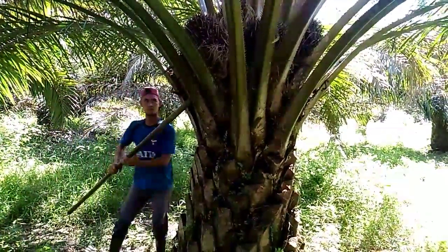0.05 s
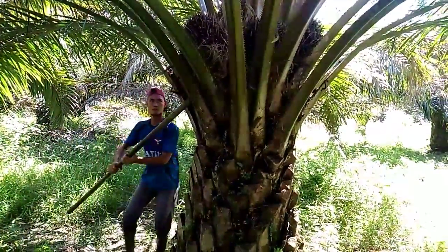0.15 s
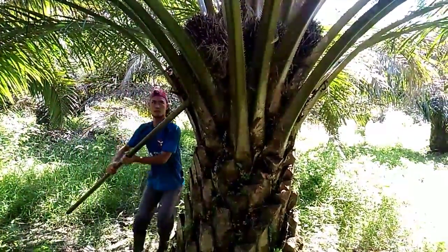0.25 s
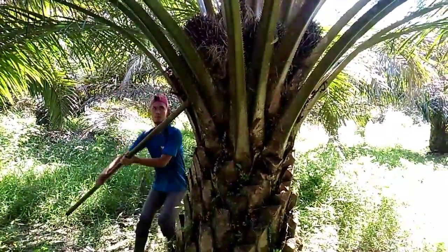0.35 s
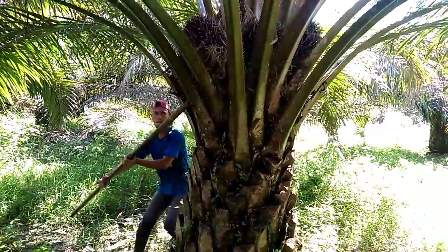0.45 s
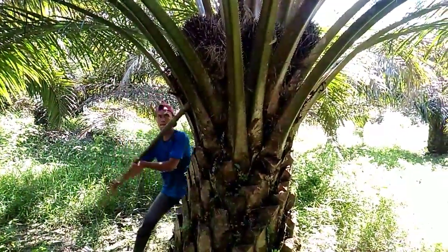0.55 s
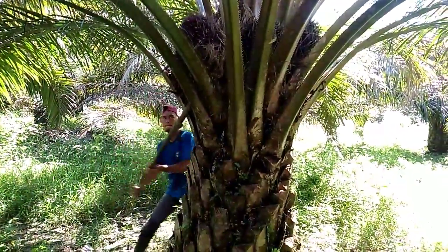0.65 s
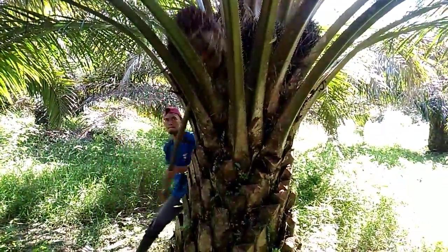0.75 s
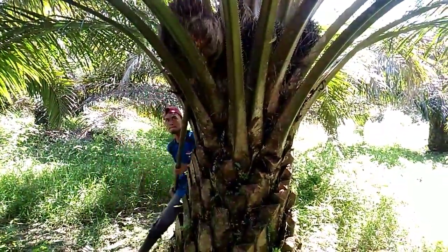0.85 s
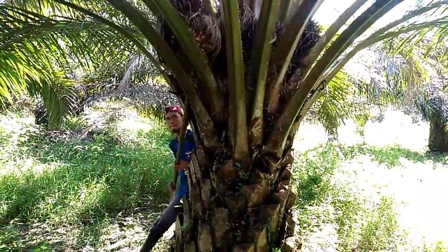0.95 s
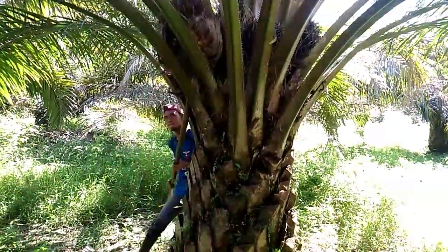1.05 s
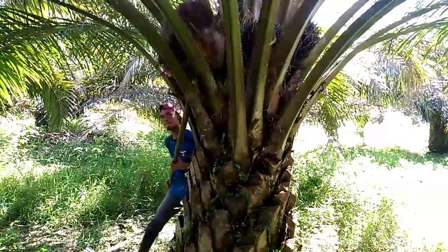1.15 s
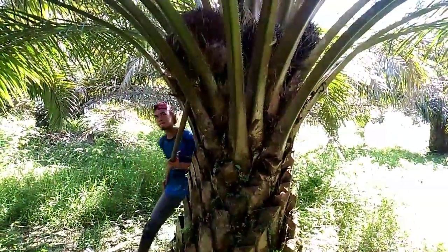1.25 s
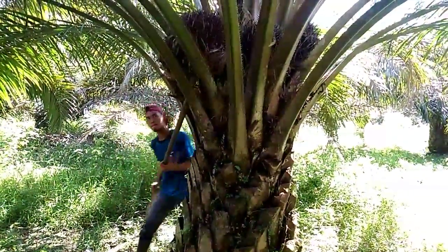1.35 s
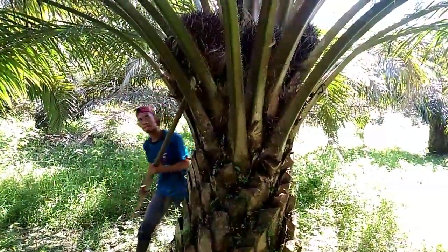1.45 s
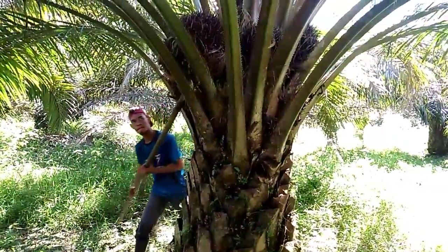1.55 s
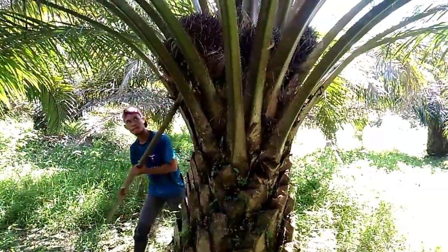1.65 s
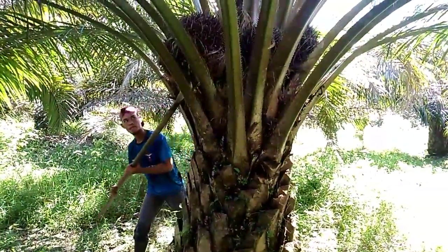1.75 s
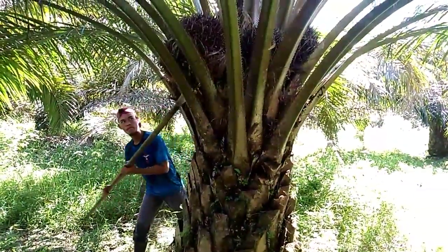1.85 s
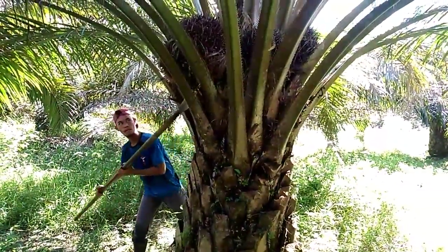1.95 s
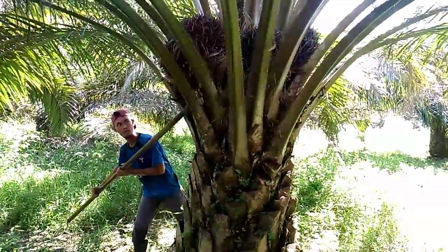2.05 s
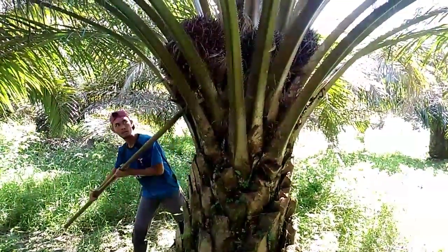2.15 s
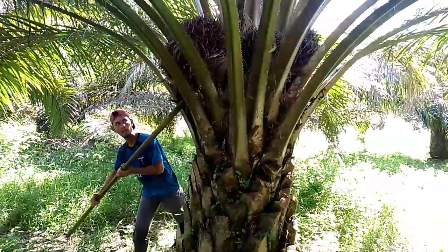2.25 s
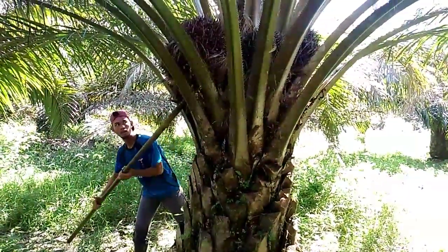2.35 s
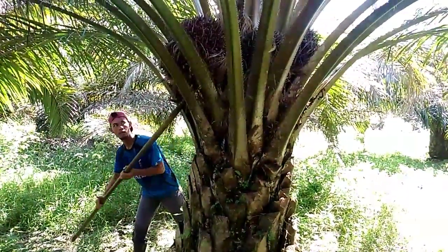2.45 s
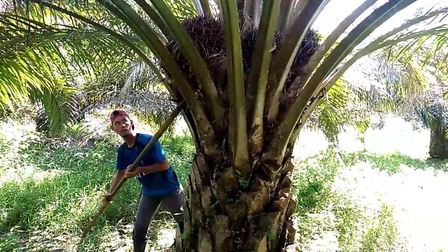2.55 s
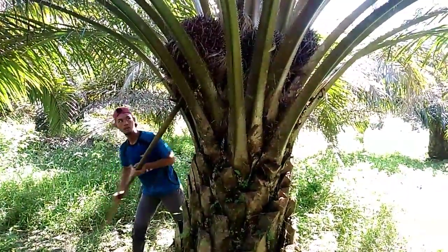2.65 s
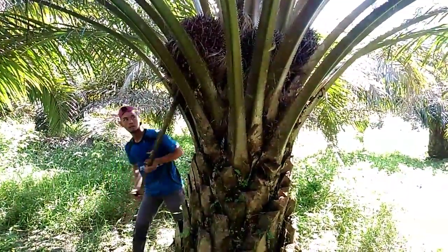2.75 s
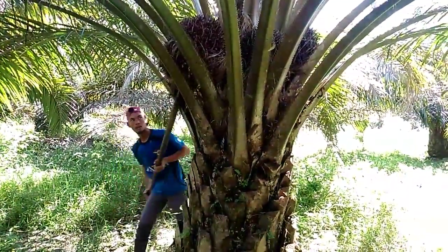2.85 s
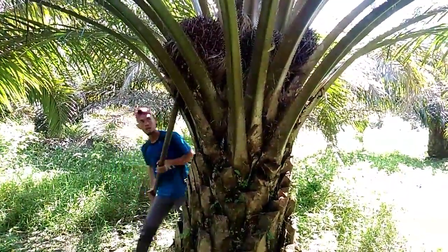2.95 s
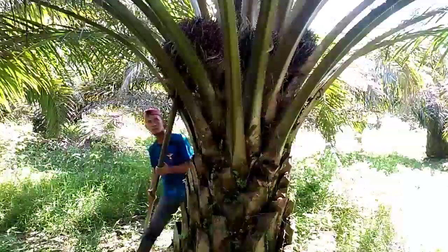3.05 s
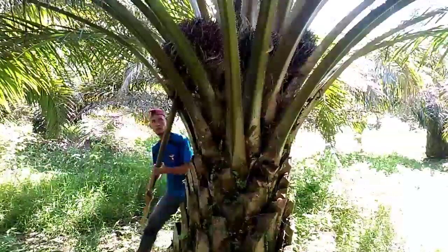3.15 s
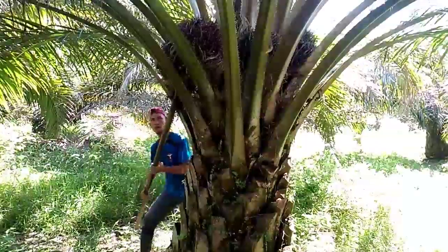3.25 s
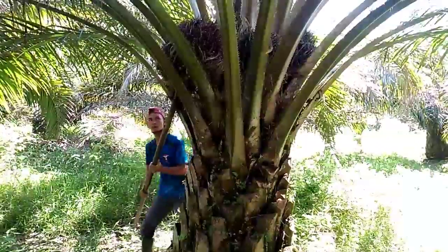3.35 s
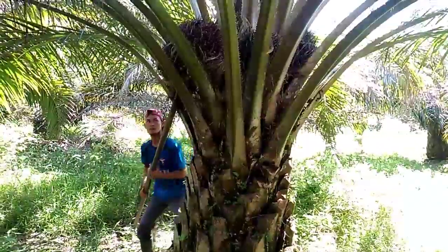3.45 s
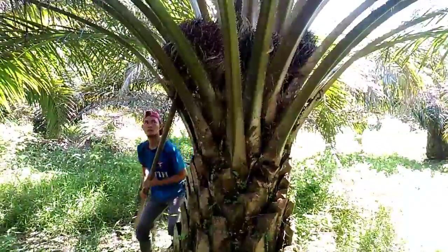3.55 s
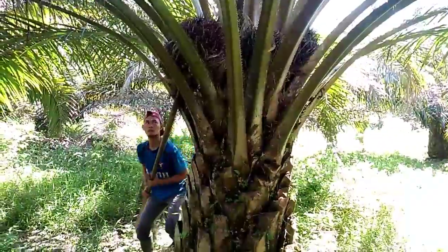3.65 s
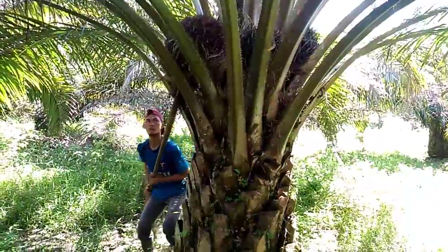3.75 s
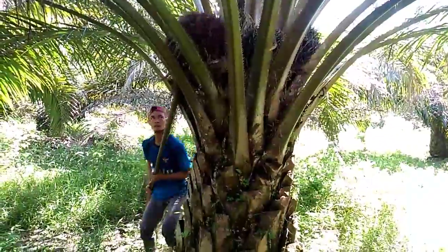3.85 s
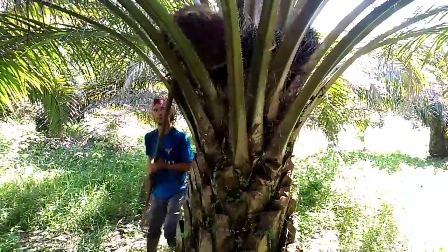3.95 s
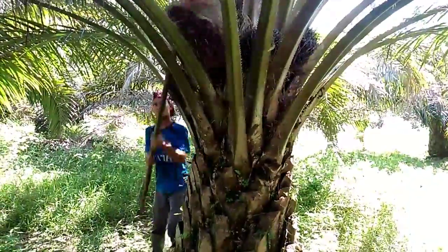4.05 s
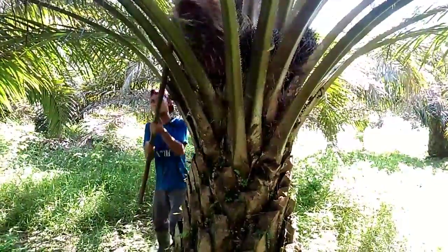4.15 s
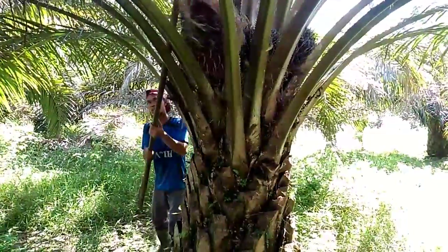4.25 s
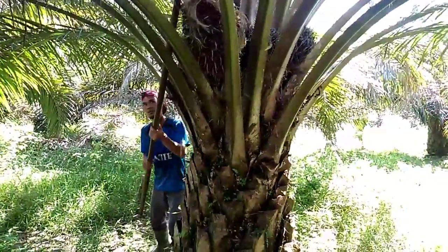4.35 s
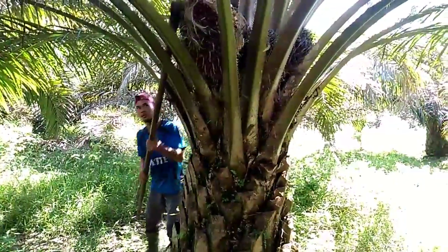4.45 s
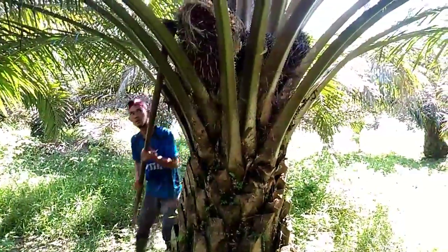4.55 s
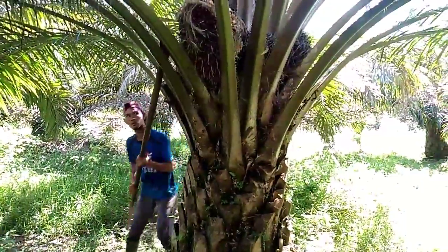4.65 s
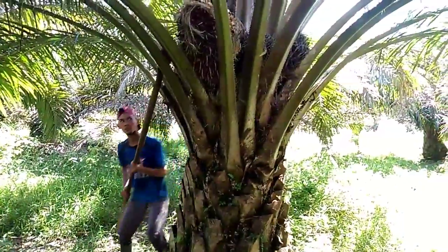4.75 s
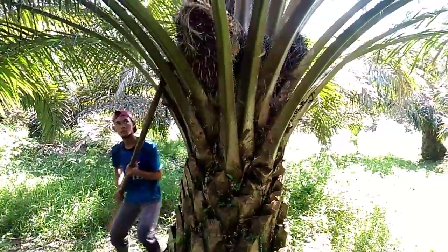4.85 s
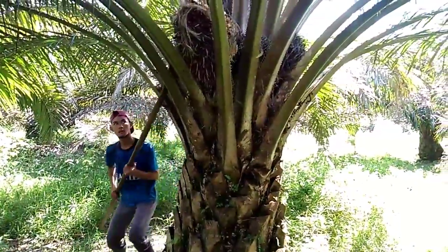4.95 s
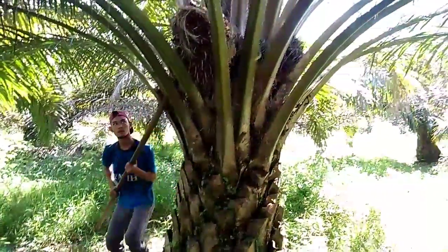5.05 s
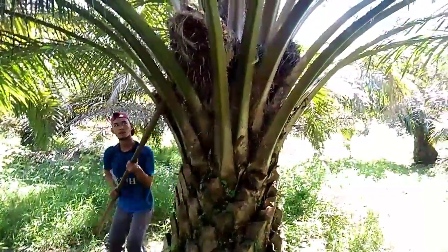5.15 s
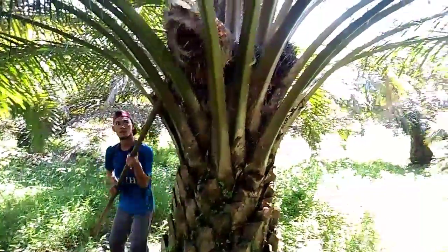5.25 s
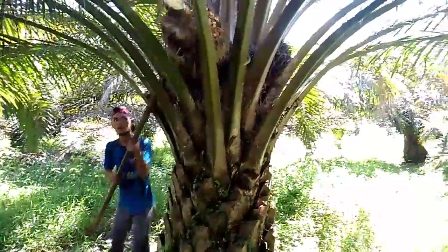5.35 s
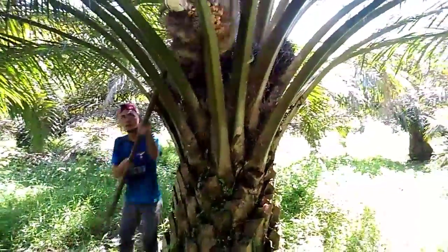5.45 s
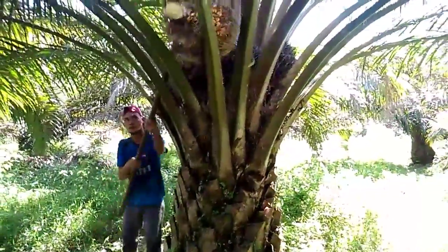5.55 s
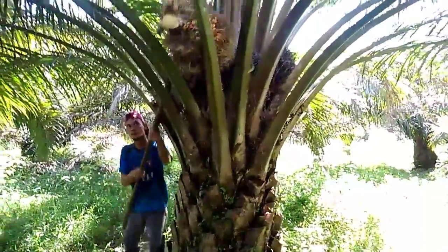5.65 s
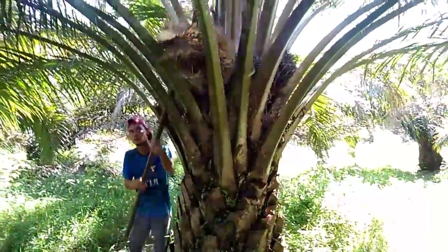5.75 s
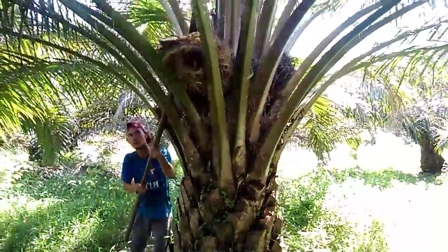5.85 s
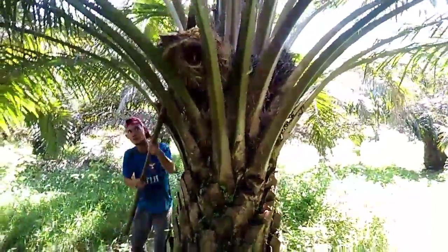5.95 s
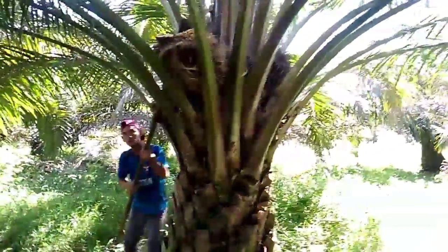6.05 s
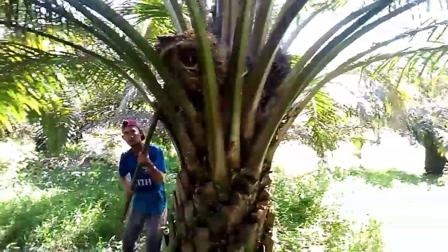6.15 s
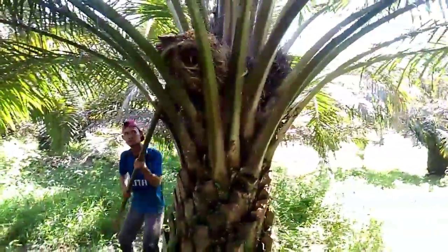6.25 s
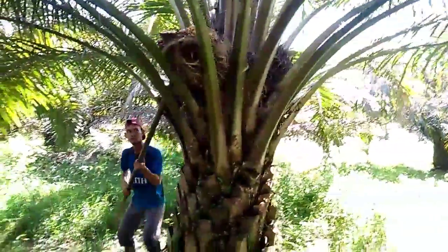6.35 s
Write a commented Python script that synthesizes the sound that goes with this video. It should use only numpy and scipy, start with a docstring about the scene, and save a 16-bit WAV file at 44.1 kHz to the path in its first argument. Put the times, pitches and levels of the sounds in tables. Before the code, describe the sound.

Outdoors in a palm grove, over a wavering low rumble, thin insect and leaf hiss and a barely audible far hum, a pole blade starts knocking woody stalks within 0.1-0.75 s, short and dry, with fibre clicks. At 0.8 s a frond tears loose: bright leaflet hiss, crackling ribs and a stalk scrape, with snaps, knocks and dull thuds, fading until 1.9 s. Then a lull: soft leaf swishes from 2.1 s, a double knock at 2.4, another with a small snap at 2.9, near quiet until 3.9. A second frond rustles and drags from 3.9 to 4.9 s amid repeated chops and sharp cracks. At 5.24 s comes the loudest, hard woody blow; a third frond crashes at 5.3, a fourth at 5.8 with heavy knocks and low thuds, settling by 6.5 s. The sound is close, short-tailed and louder on the left.

```python
"""Oil palm harvest

A long pole chisel works in the crown of an oil palm: its blade knocks on woody stalks (noisy blows through damped
resonances), fibres snap (clicks and decaying crackle), and four fronds crash and drag, the last two back to back
(crackle and ringing ticks), with butts thudding and the pole brushing leaves. Behind lie a rumble, a thin hiss of
insects and leaves and a far hum. The left microphone port is louder; the highest peaks clip softly."""
import sys
import numpy as np
from scipy import signal
from scipy.fft import rfft, irfft, next_fast_len
from scipy.io import wavfile
from scipy.ndimage import uniform_filter1d, map_coordinates

SR = 44100
rng = np.random.default_rng(int(sys.argv[2]) if len(sys.argv) > 2 else 0)


def digitize_waveform(pressure):
    """Quantize a signal to 16-bit integers and store it at the path in sys.argv[1].

    Rows of a 2-D input are taken as channels; values are limited to [-1, 1].
    """
    field = np.atleast_2d(pressure).T
    bounded = np.clip(field, -1, 1)
    quanta = np.round(bounded * 32767).astype(np.int16)
    wavfile.write(sys.argv[1], SR, quanta)


N = 282240

# fronds tearing loose: (start [s], build-up [s], length [s], top level [dB], fade [dB/s], stalk scrape level [dB])
FROND_DRAGS = [(0.802, 0.19, 1.092, -22.5, 13, -30), (3.906, 0.2, 0.99, -25, 6, -35.5),
               (5.287, 0.26, 0.52, -19, 15, -32), (5.823, 0.078, 0.67, -18, 22.5, -37.5)]
# blade on stalks: (time [s], peak level [dB], contact centre [Hz], chatter t60 [s], floored at 0.005)
BLADE_BLOWS = [(0.083, -40.5, 408, 0.047), (0.123, -39, 550, 0.0093), (0.293, -25, 680, 0.0087),
               (0.334, -16, 580, 0.0041), (0.347, -26.5, 686, 0.26), (0.36, -34, 560, 0.059),
               (0.402, -23, 1390, 0.023), (0.412, -19.5, 1180, 0.033), (0.606, -38.5, 770, 0.11),
               (0.651, -28, 460, 0.062), (0.748, -23.5, 1100, 0.097), (0.803, -19.5, 546, .05),
               (0.820, -17.5, 1490, 0.046), (0.901, -18, 536, 0.06), (1.064, -17.5, 613, 0.021),
               (1.136, -15, 1020, 0.061), (1.202, -16.5, 383, 0.064), (1.378, -27, 535, 0.12),
               (2.177, -36.5, 604, 0.16), (2.384, -19.5, 620, 0.06), (2.392, -19.5, 550, 0.028),
               (2.682, -42.5, 910, 0.16), (2.879, -22, 750, 0.097), (2.944, -42.5, 745, 0.24),
               (3.093, -47.5, 587, 0.2), (4.000, -20.5, 370, 0.33), (4.11, -19, 500, 0.032),
               (4.203, -14.5, 1170, 0.041), (4.297, -25.5, 463, 0.45), (4.406, -22, 500, 0.06),
               (4.593, -14.5, 467, 0.13), (4.713, -25.5, 980, 0.13), (4.809, -24.5, 800, 0.053),
               (5.237, -1.5, 720, 0.041), (5.737, -26, 595, 0.12), (5.854, -18.5, 360, 0.063),
               (5.878, -10, 610, 0.31), (6.062, -20.5, 342, 0.14)]
# crackle of ribs and woody fibres: (frequency [Hz], relative density [dB])
RIB_SPECTRUM = [(500, -24), (1000, -8), (1600, -4), (2200, -4), (3100, -0.5), (4500, -3.5), (7000, -7.5),
                (14000, -36)]


def fronds():
    """Leaflets slap and hiss, their ribs crackle, and the heavy stalk scrapes down the trunk in slight jerks."""
    # leaflet hiss: (frequency [Hz], relative density [dB])
    leaflet_spectrum = [(1500, -31), (3500, -14), (5500, -8), (7200, -3.5), (8500, 0), (10000, -6),
                        (12000, -4), (15500, -10)]
    # stalk on trunk: (frequency [Hz], relative density [dB])
    scrape_spectrum = [(50, -14.5), (140, -23), (215, -19), (350, -3), (450, -4), (620, -4.5), (850, -8.5),
                       (1200, -6), (2500, -24)]
    hiss_gain, rib_gain, scrape_gain = drags()
    jerks = amp(0.12 * wobble(40))

    slaps = spread(crackle(rate=840, size_db=4.0, life_s=0.00083, bed_db=6), leaflet_spectrum)
    leaves = amp(4.0) * patchy(slaps, depth_db=3.0)
    leaves += amp(-12.5) * ticks(rate=250, lo_hz=4900, hi_hz=13000, cycles=4.5, size_db=1)

    cracks = spread(crackle(rate=110, size_db=-0.5, life_s=0.0052, bed_db=4.0), RIB_SPECTRUM)
    ribs = amp(1.5) * patchy(cracks, depth_db=2)
    ribs += amp(-11.5) * ticks(rate=270, lo_hz=1730, hi_hz=5500, cycles=5.5, size_db=7.5)

    scrape = amp(2.0) * spread(crackle(rate=130, size_db=-2.0, life_s=0.0072, bed_db=-5), scrape_spectrum)
    return jerks * ((hiss_gain + sway()) * leaves + rib_gain * ribs + scrape_gain * scrape)


def drags():
    """Gains of hiss, ribs and scrape: each frond gathers speed, slows and comes to rest, stalk first, leaflets last."""
    build_db, onset_db_per_s, settle_db_per_s = 7, 1197, 178
    ribs_db, ribs_grow, ribs_share = -6.5, 1.49, 0.946  # re hiss; power of its speed gain; share of the length
    scrape_hold_s, scrape_grow = 0.071, 2.11  # holds, then fades this many times faster than the hiss
    scrape_onset_db_per_s, scrape_share = 514, 0.79
    brake_s = 0.031  # rounds the knee into the stop
    gains = np.zeros((3, N))
    for start, build, length, db, fade, scrape_db in FROND_DRAGS:
        age = np.arange(N) / SR - start
        after = lambda s: np.maximum(age - s, 0)
        braking = lambda share: brake_s * np.logaddexp(0, (age - share * length) / brake_s)
        gate_db = lambda onset, share: onset * np.minimum(age, 0) - settle_db_per_s * braking(share)
        speed_db = -build_db * np.clip(1 - age / build, 0, 1) - fade * after(build)
        slowing_db = scrape_grow * fade * after(scrape_hold_s)
        hiss_level = db + speed_db + gate_db(onset_db_per_s, 0.99)
        rib_level = db + ribs_db + ribs_grow * speed_db + gate_db(onset_db_per_s, ribs_share)
        scrape_level = scrape_db - slowing_db + gate_db(scrape_onset_db_per_s, scrape_share)
        gains += amp([hiss_level, rib_level, scrape_level])
    return gains


def sway():
    """Gain of the foliage, stirred alike by every blow and by the end of every drag, its energy dying away."""
    stir_db, fade_db_per_s = -66, 12
    shoves = np.zeros(N)
    for s in [row[0] for row in BLADE_BLOWS] + [row[0] + row[2] for row in FROND_DRAGS]:
        add(shoves, s, np.ones(1))
    energy = signal.lfilter([1], [1, -amp(-fade_db_per_s / SR) ** 2], shoves)
    return amp(stir_db) * np.sqrt(energy)


def snaps():
    """A fibre bundle strains, gives with a sharp click, then splinters in a dying, patchy spray."""
    # breaks: (time [s], relative level [dB], woody crack re break [dB], click re break [dB])
    breaks = [(0.251, -27.5, -23, 8), (0.4006, -16.5, -10.5, -13), (0.4104, -38, -29, -9),
              (0.5068, -17.5, -60, 24), (0.606, -46, 4.5, -10), (0.6492, -11, -19.5, -5),
              (0.679, -20, -39, -1), (0.7465, -38, 5.5, -4), (0.7864, -9.5, -14, 5), (0.8176, 1, -13, 8),
              (0.901, 1.5, -13.5, 0), (0.92, -1, -17.5, 9), (1.133, -15.5, -4, 4), (1.2552, -6, -24, 15),
              (1.2678, -1.5, -27, 18.5), (1.2994, -2, -23.5, 0), (1.4547, -4, -24, 13.5),
              (1.5733, -4, -22, 20.5), (2.8783, -27.5, -5, -15), (3.8845, -15.5, -25, 11),
              (3.908, -21, -27, 18), (4.0013, 0, -8.5, 11), (4.1714, -3.5, -25, 15), (4.237, -3, -23, 15),
              (4.339, -6, -15.5, 23.5), (4.381, 3, -17, 5), (4.5418, -9, -35, 12), (4.5915, 3.5, -18.5, 4),
              (5.2367, -5, -10.5, -18), (5.3122, -4.5, -9, -17), (5.3673, -4.5, -14, 16),
              (5.5464, 0, -31, 12), (5.7368, 1, -17.5, -9), (5.8163, -8, -6.5, 6), (5.9444, 2.5, -14, 2),
              (6.142, -3, -21, -8)]
    # splintering: (frequency [Hz], relative density [dB])
    splinter_spectrum = [(2000, -20), (4000, -22.5), (6500, -1), (8500, 7.5), (10000, 3), (12000, 5),
                         (15500, -0.5)]
    t60_at_0_db_s, halving_db = 0.19, 71  # harder breaks end sooner
    lead_s = 0.0012
    (clicks, bright, woody), t = np.zeros((3, N)), np.arange(-SR // 20, SR // 2) / SR
    for s, db, crack_db, click_db in breaks:
        t60_s = t60_at_0_db_s * 2 ** (-db / halving_db)
        click = amp(click_db - 9.5) * swell(t, 0, 0.005)
        spray = amp(-5.5) * swell(t, lead_s, t60_s)
        add(clicks, s + t[0], amp(db) * click)
        add(bright, s + t[0], amp(db) * spray)
        add(woody, s + t[0], amp(db + crack_db) * (click + spray))

    sharp = unit(spread(rng.standard_normal((2, N)), splinter_spectrum))
    fine = spread(crackle(rate=800, size_db=-2.5, life_s=0.0005, bed_db=-1), splinter_spectrum)
    fine = patchy(fine, depth_db=1.0)
    coarse = spread(crackle(rate=400, size_db=14, life_s=0.00045, bed_db=8), RIB_SPECTRUM)
    coarse = patchy(coarse, depth_db=2.5)
    return amp(-8.0) * clicks * sharp + amp(-7.5) * bright * fine + amp(0.5) * woody * coarse


def knocks(dead_db=-9, chatter=0.2, bandwidth=1.505):
    """The blade scuffs, shoves the stalk and chatters on through its fibres; each contact has its own centre."""
    scuff_share, scuff_max_s = 0.044, 0.0048  # lead-in over t60, and its upper limit
    track, t = np.zeros(N), np.arange(-SR // 20, SR // 4) / SR
    soft = lambda ratio: 1 / (1 + 1j * np.sqrt(2) * ratio - ratio ** 2) ** 2  # wet tissue takes the edge off
    for s, db, centre_hz, t60_s in BLADE_BLOWS:
        scuff_s = min(scuff_share * t60_s, scuff_max_s)
        force = (t == 0) + chatter * rng.standard_normal(len(t)) * swell(t, scuff_s, t60_s)
        contact = lambda hz: band(hz, centre_hz, 0.95) * soft(hz / (bandwidth * centre_hz))
        blow = filtered(force, lambda hz: contact(hz) * (stalk(hz) + amp(dead_db)))
        add(track, s + t[0], amp(db) * blow / np.abs(blow).max())
    return track


def stalk(hz):
    """The damped resonances of a thick, wet frond base."""
    # modes: (centre [Hz], width [Hz], gain [dB])
    modes = [(364, 87, -7.5), (627, 150, -2.5), (805, 65, -7), (1100, 200, -4), (1550, 440, 0),
             (2190, 53, 11)]
    return sum(amp(db) * band(hz, centre_hz, centre_hz / width_hz) for centre_hz, width_hz, db in modes)


def thuds():
    """A heavy frond butt lands on trunk or ground with a dull, quickly damped swing."""
    # landings: (time [s], relative level [dB], pitch [Hz])
    landings = [(1.134, -21, 300), (1.196, -15, 334), (1.225, -25.5, 144), (2.179, -22, 300),
                (2.365, -29.5, 303), (2.383, -24, 317), (4.002, -17.5, 288), (4.595, -13, 340),
                (5.238, -16, 370), (5.522, -18.5, 356), (5.874, -11, 284), (5.897, -11.5, 158),
                (5.927, -18, 314), (5.987, -20, 128), (6.062, -19, 274)]
    track = np.zeros(N)
    for s, db, hz in landings:
        add(track, s, push(db - 6.5, hz, life_s=0.005))
    return track


def grove(x, t60_s=0.17):
    """Trunks and leaves scatter a short tail: decaying noise, separate for each side."""
    t = np.arange(SR // 2) / SR
    tail = rng.standard_normal((2, len(t))) * amp(-60 * t / t60_s) * (1 - np.exp(-t / 0.0017))
    return signal.fftconvolve(x[None], tail / np.linalg.norm(tail[0]), axes=1)[:, :N]


def brushes(lead_s=0.0034, sharpness=0.74):
    """The pole grazes single leaves in soft swishes of band-passed noise."""
    # grazes: (time [s], rms level before the envelope [dB], centre [Hz], t60 [s])
    grazes = [(2.093, -47, 1740, 0.083), (2.387, -38.5, 5500, 0.34), (2.684, -52, 4770, 0.22),
              (2.784, -58, 1380, .08), (2.838, -52, 5940, 0.48), (3.152, -50.5, 4830, 0.18),
              (3.6, -50.5, 10900, 0.19), (5.228, -27, 1520, 0.23)]
    track, t = np.zeros((2, N)), np.arange(-SR // 20, SR // 3) / SR
    for s, db, centre_hz, t60_s in grazes:
        noise = rng.standard_normal((2, len(t)))
        swish = unit(filtered(noise, lambda hz: band(hz, centre_hz, sharpness) ** 2))
        add(track, s + t[0], amp(db) * swish * swell(t, lead_s, t60_s))
    return track


def bumps():
    """Swells of air push the microphone, mostly at its left port."""
    # air pushes: (time [s], relative level [dB])
    air_pushes = [(0.55, -31.5), (2.179, -32), (3.917, -27), (5.505, -26.5)]
    track = np.zeros(N)
    for s, db in air_pushes:
        add(track, s, push(db + 0.5, hz=43.5, life_s=0.012))
    return track * amp([[2], [-12]])


def background(hum_hz=156):
    """Wavering low rumble, a thin patchy hiss of insects and leaves, and a far engine hum that fades and returns."""
    # hiss: (frequency [Hz], relative density [dB])
    air_spectrum = [(200, -17.5), (500, -2.5), (1000, -9.5), (2500, -8.5), (5000, -11), (8300, -7),
                    (10500, -9), (15500, -14.5)]
    # rumble: (frequency [Hz], relative density [dB])
    rumble_spectrum = [(20, -0.5), (35, 5.5), (55, -5), (80, -4.5), (125, -3.5), (165, -8.5), (200, -13.5),
                       (300, -21.5), (600, -46.5)]
    # hum: (time [s], rms level [dB])
    hum_levels = [(0, -59), (0.75, -58), (1.6, -83), (6.4, -60.5)]
    air_db, rumble_db = -60, -53.5
    t = np.arange(N) / SR
    air = amp(air_db) * patchy(spread(rng.standard_normal((2, N)), air_spectrum), depth_db=5.5)
    rumble = amp(rumble_db + 0.54 * wobble(7)) * spread(rng.standard_normal((2, N)), rumble_spectrum)
    hum_db = np.interp(t, *np.transpose(hum_levels))
    hum = amp(hum_db) * np.sqrt(2) * np.sin(2 * np.pi * hum_hz * t + 0.14 * wobble(2.4))
    return air + rumble + hum


def crackle(rate, size_db, life_s, bed_db):
    """Tiny contacts of random size (rate per second), each a short noise burst, over a steady bed; rms 1."""
    sizes = amp(size_db * np.minimum(rng.standard_normal(N), 2.5))
    contacts = (rng.random(N) < rate / SR) * sizes
    energy = signal.lfilter([1], [1, -np.exp(-2 / (life_s * SR))], contacts ** 2)
    return unit(np.sqrt(energy / energy.mean() + amp(bed_db) ** 2) * rng.standard_normal((2, N)))


def ticks(rate, lo_hz, hi_hz, cycles, size_db):
    """Single stiff leaflets and ribs flicking, each ringing for a few cycles at its own pitch; rms 1."""
    u = rng.random((int(rate * N / SR), 4))  # columns: time, pitch, size, side
    hz, samples = lo_hz * (hi_hz / lo_hz) ** u[:, 1:2], np.arange(300)
    size = amp(-size_db * np.log(np.maximum(u[:, 2:3], 0.04)))
    rings = size * np.sin(2 * np.pi * hz * samples / SR) * np.exp(-hz * samples / SR / cycles)
    at = (u[:, :1] * N).astype(int) + samples
    # the two ports catch each flick at different strengths
    sides = 1, np.sqrt(2) * np.cos(2 * np.pi * u[:, 3:])
    return unit(np.array([np.bincount(at.ravel(), (side * rings).ravel(), N)[:N] for side in sides]))


def patchy(x, depth_db):
    """Random gains, smoothed over time and frequency, make the sound patchy; rms 1."""
    z = signal.stft(x, nperseg=512)[2]
    field = rng.standard_normal(z.shape[1:])
    field = uniform_filter1d(uniform_filter1d(field, size=4, axis=0), size=7, axis=1)
    return unit(signal.istft(z * amp(depth_db * unit(field)), nperseg=512)[1][:, :N])


def push(db, hz, life_s):
    """A soft push that swings for only a few cycles."""
    t = np.arange(SR // 4) / SR
    return -amp(db) * t / life_s * np.exp(1 - t / life_s) * np.sin(2 * np.pi * hz * t)


def swell(t, lead_s, t60_s):
    """An exponential lead-in that grows up to t = 0, then a decay; both have a shortest length."""
    rise = np.exp(np.minimum(t, 0) / max(lead_s, 0.0002))
    return rise * amp(-60 * np.maximum(t, 0) / max(t60_s, 0.005))


def band(hz, centre_hz, sharpness):
    """One damped resonance with a gain of 1 at its centre."""
    return 1j * hz * centre_hz / (sharpness * (centre_hz ** 2 - hz ** 2) + 1j * hz * centre_hz)


def spread(pair, spectrum):
    """Colour two unrelated signals at constant power and blend them into left and right, alike in the bass."""
    # likeness of the two ports: (frequency [Hz], correlation [-1..1])
    likeness = [(40, 1), (150, 1), (600, 0.96), (1400, 0.3), (3100, 0.18), (6500, 0.0059)]
    turn = lambda hz: np.arccos(np.clip(along(likeness, hz), -1, 1)) / 2
    norm = np.sqrt(np.mean(amp(along(spectrum, np.linspace(0, SR / 2, 4096))) ** 2))
    colour = lambda hz: amp(along(spectrum, hz)) / norm
    mid, side = filtered(pair, lambda hz: colour(hz) * [np.cos(turn(hz)), np.sin(turn(hz))])
    return np.array([mid + side, mid - side])


def amp(db):
    """Decibels to gain."""
    return 10 ** (np.asarray(db) / 20)


def unit(x):
    """Scale to rms 1."""
    return x / np.sqrt(np.mean(x ** 2) + 1e-20)


def along(points, hz):
    """Interpolate (frequency [Hz], value) points on a log frequency axis."""
    f, v = np.transpose(points)
    return np.interp(np.log(hz + 1), np.log(f + 1), v)


def wobble(rate):
    """A smooth random curve, rate knots a second."""
    knots = rng.standard_normal(int(N * rate / SR) + 4)
    return map_coordinates(knots, [np.arange(N) * rate / SR])


def filtered(x, response):
    """Filter x by a complex response of frequency, zero-padded against wrap-around."""
    n = x.shape[-1]
    m = next_fast_len(n + SR // 5)
    return irfft(rfft(x, m) * response(np.fft.rfftfreq(m, 1 / SR)), m)[..., :n]


def add(track, s, sound):
    """Mix a sound into a track at s seconds."""
    part = track[..., max(round(s * SR), 0):][..., :sound.shape[-1]]
    part += sound[..., :part.shape[-1]]


def scene():
    """All the sources at the two ports."""
    wood = knocks() + thuds()
    return fronds() + snaps() + brushes() + wood + amp(-12.5) * grove(wood) + bumps() + background()


def record(dry):
    """The left port hears more; the highest peaks clip softly; a steep low-pass limits the band."""
    # port imbalance: (frequency [Hz], left minus right [dB])
    left_excess = [(50, 8.7), (200, 5.5), (700, 4.5), (2300, 6.3), (4400, 8.8), (8100, 14.9), (12000, 3.3),
                   (15500, 8.9)]
    top_hz = 15550
    share = lambda hz: 2 / (1 + amp(np.array([-along(left_excess, hz), along(left_excess, hz)])))
    ports = filtered(dry, share)
    clipped = ports / (1 + np.abs(ports) ** 6) ** (1 / 6)
    return filtered(clipped, lambda hz: 1 / np.sqrt(1 + (hz / top_hz) ** 160))


dry = scene()
out = record(dry)
digitize_waveform(out)
```